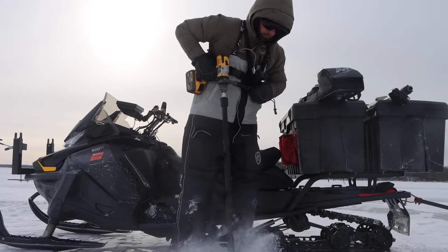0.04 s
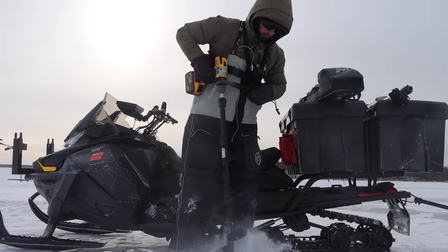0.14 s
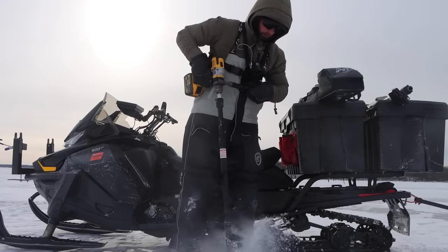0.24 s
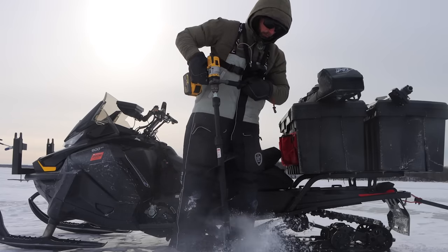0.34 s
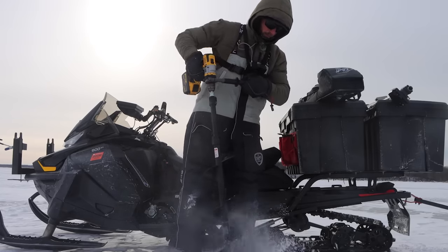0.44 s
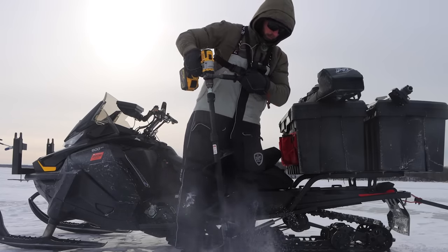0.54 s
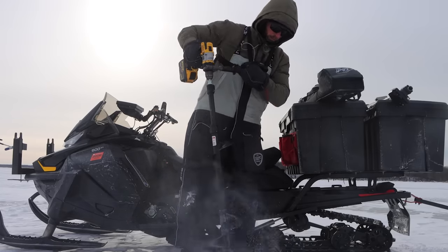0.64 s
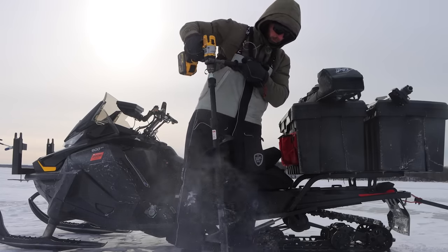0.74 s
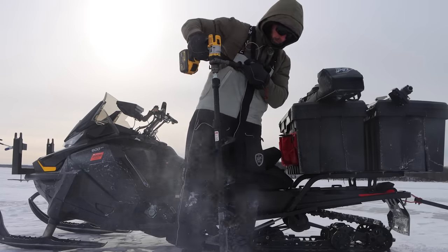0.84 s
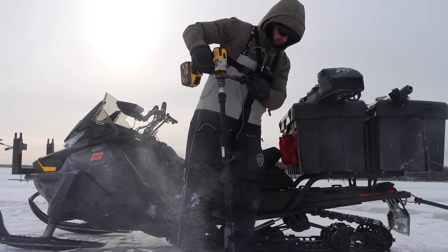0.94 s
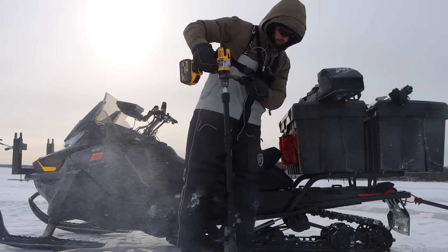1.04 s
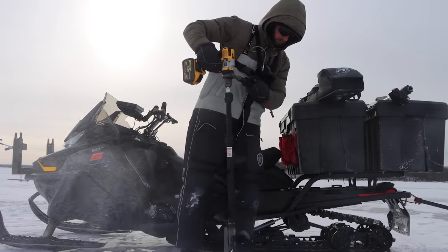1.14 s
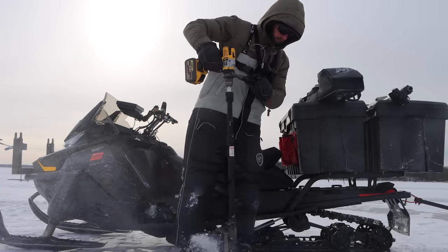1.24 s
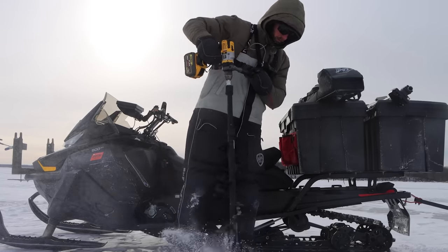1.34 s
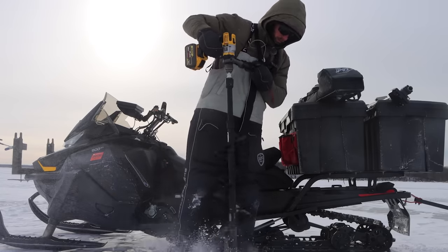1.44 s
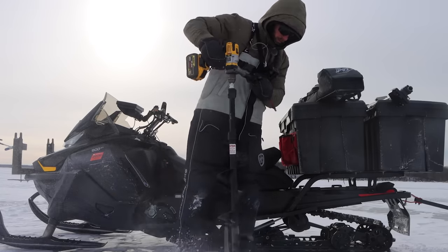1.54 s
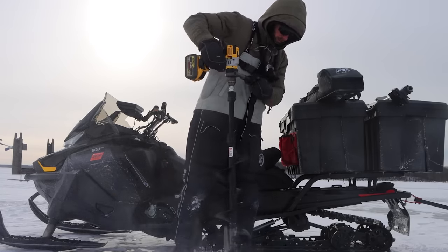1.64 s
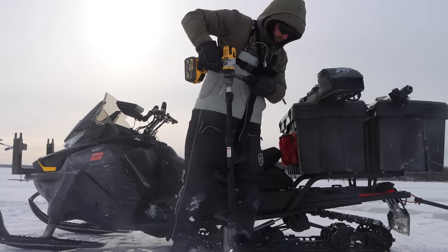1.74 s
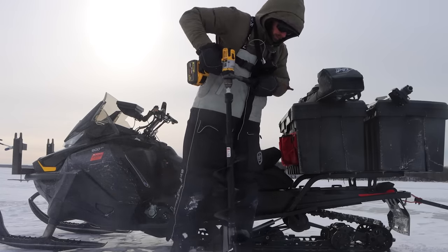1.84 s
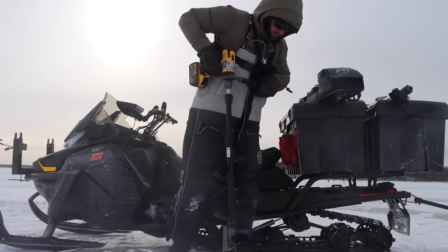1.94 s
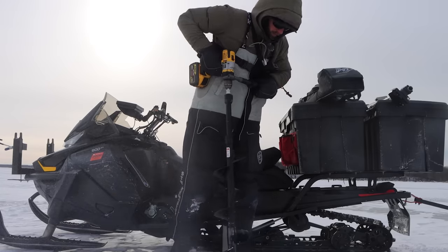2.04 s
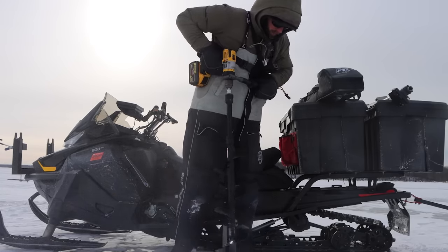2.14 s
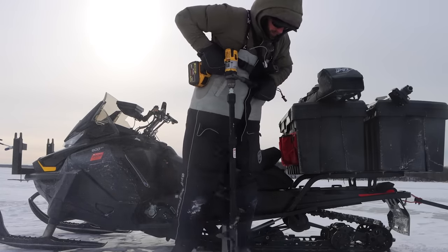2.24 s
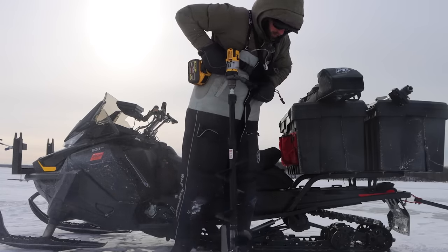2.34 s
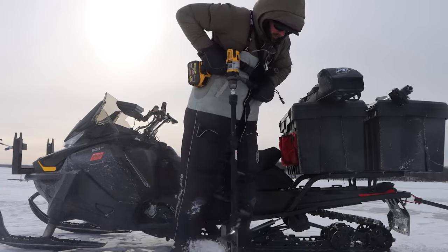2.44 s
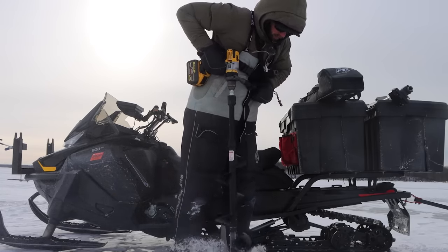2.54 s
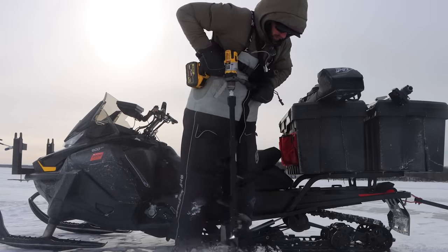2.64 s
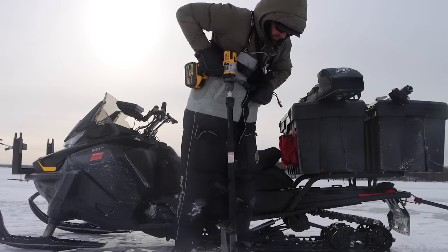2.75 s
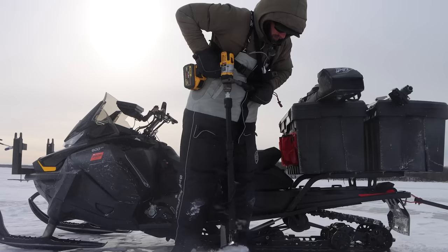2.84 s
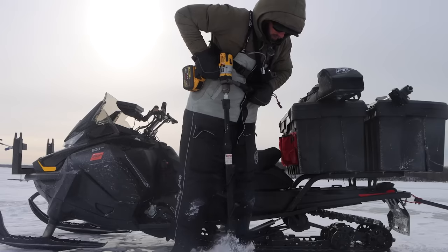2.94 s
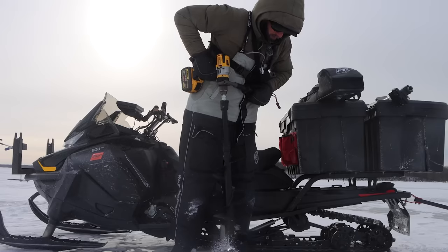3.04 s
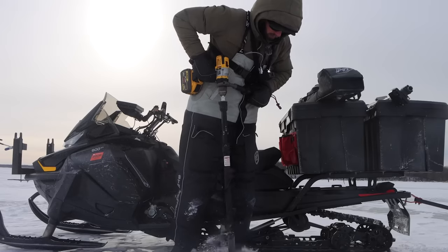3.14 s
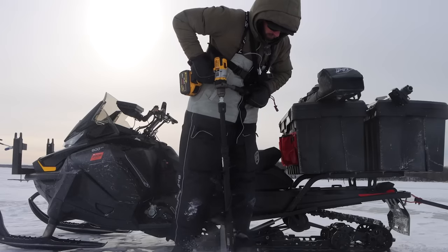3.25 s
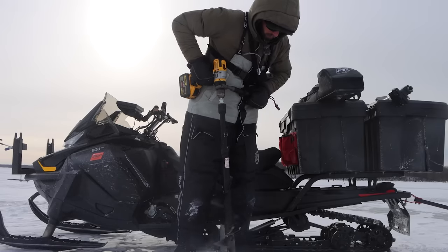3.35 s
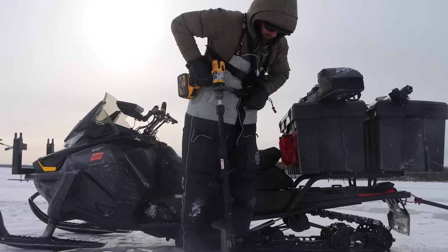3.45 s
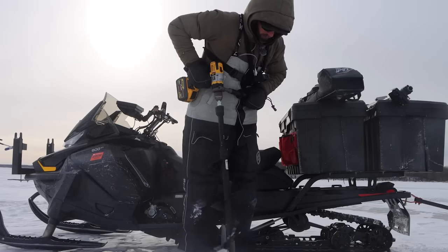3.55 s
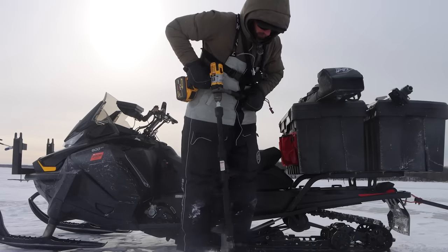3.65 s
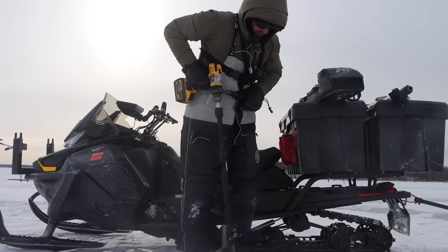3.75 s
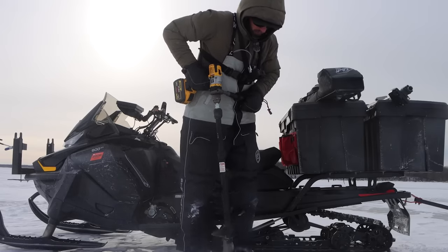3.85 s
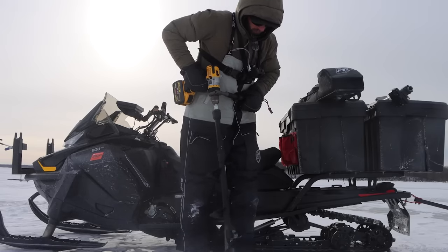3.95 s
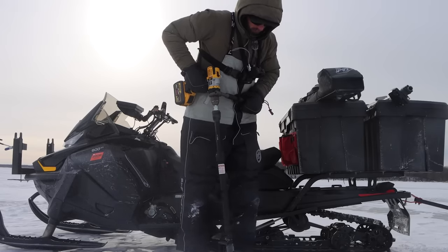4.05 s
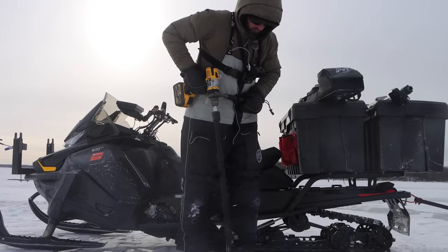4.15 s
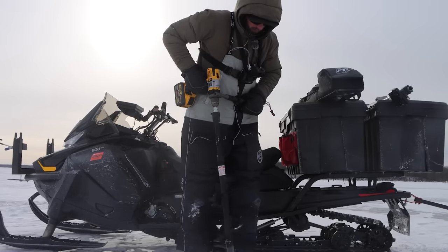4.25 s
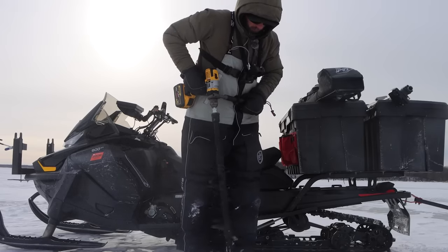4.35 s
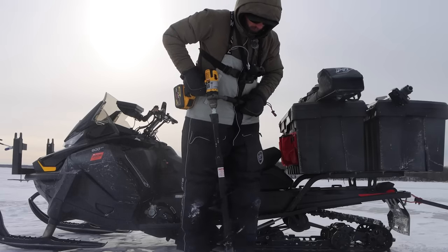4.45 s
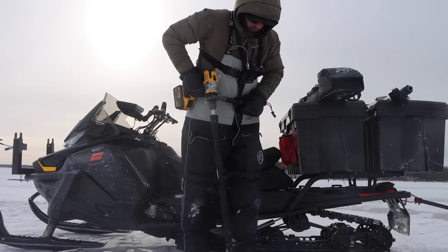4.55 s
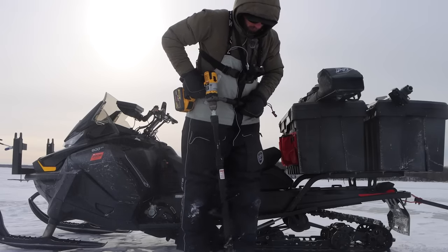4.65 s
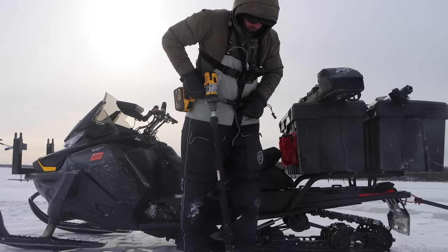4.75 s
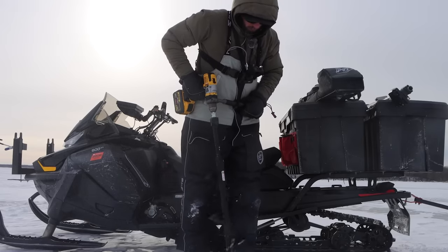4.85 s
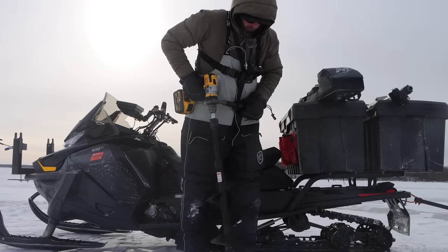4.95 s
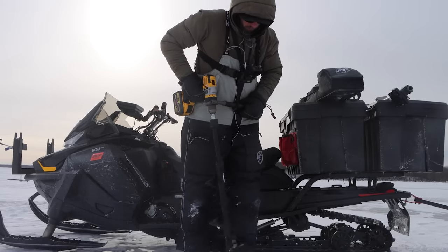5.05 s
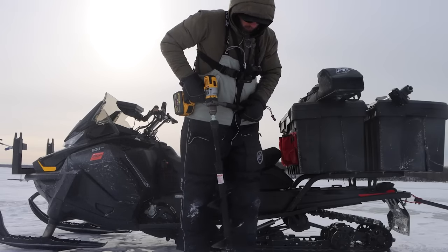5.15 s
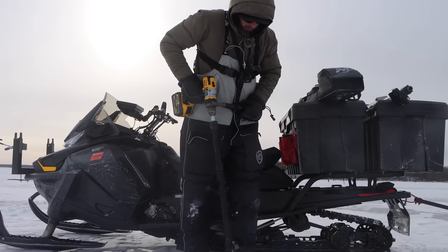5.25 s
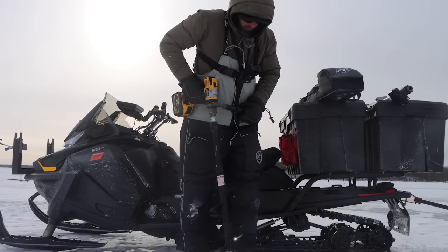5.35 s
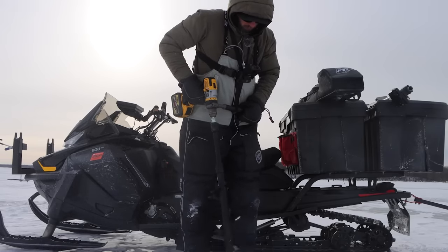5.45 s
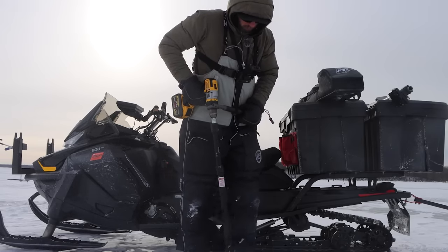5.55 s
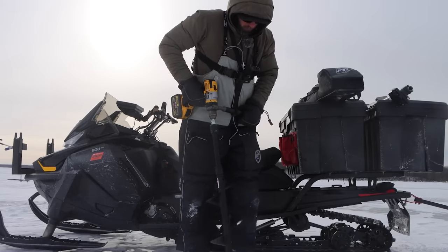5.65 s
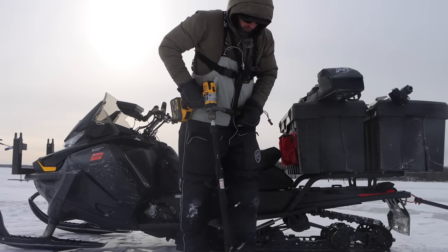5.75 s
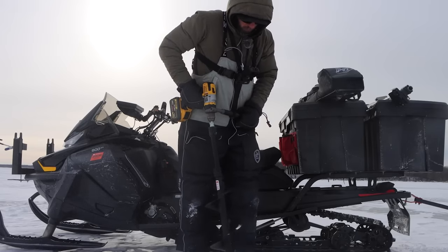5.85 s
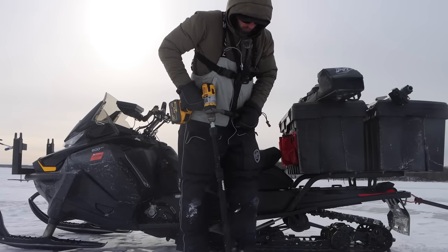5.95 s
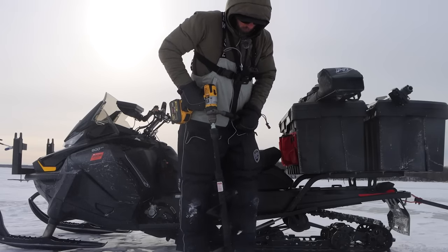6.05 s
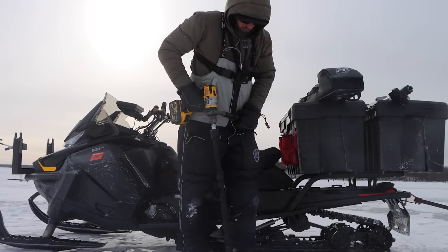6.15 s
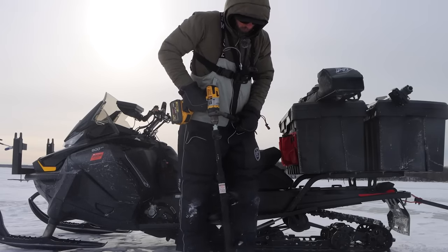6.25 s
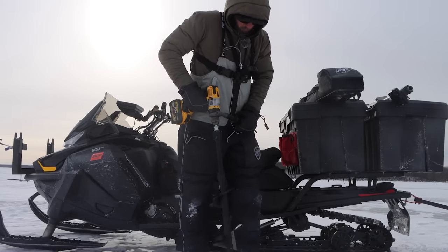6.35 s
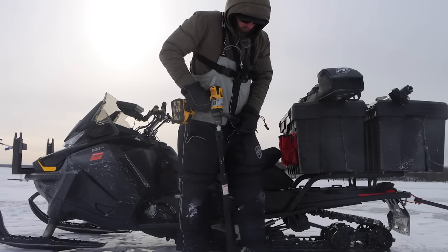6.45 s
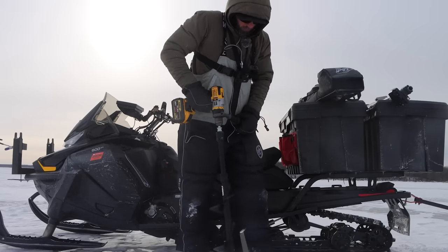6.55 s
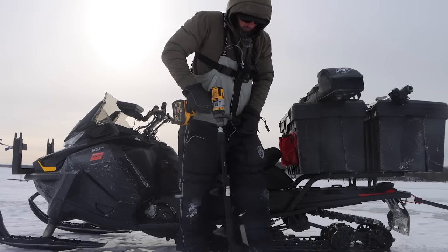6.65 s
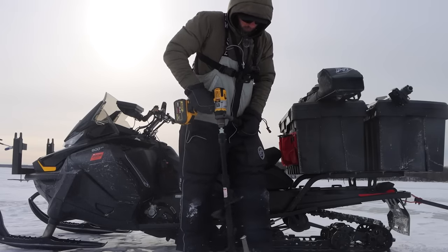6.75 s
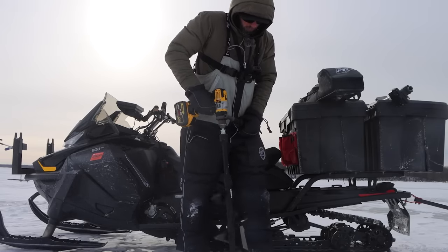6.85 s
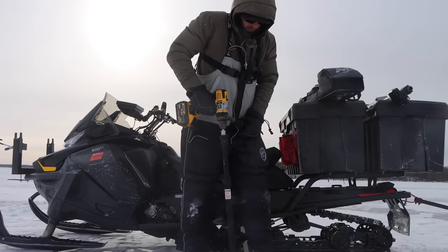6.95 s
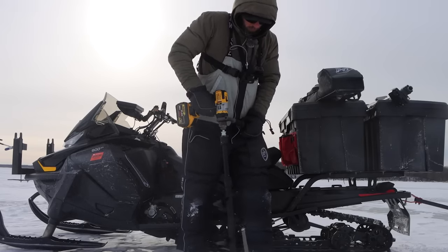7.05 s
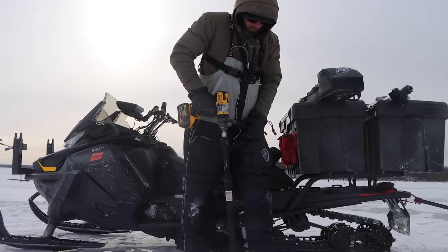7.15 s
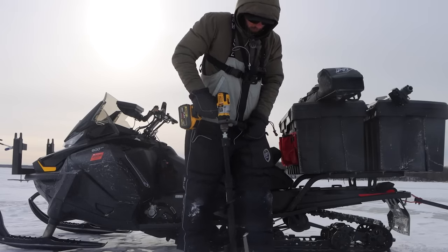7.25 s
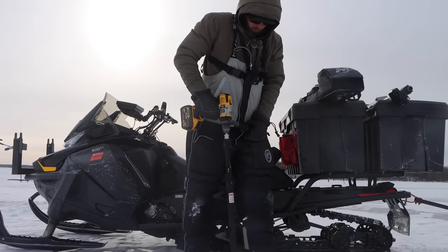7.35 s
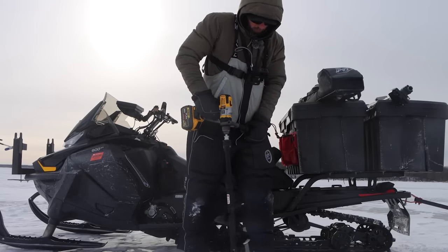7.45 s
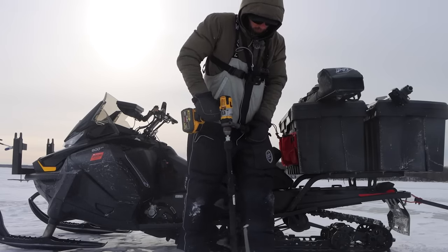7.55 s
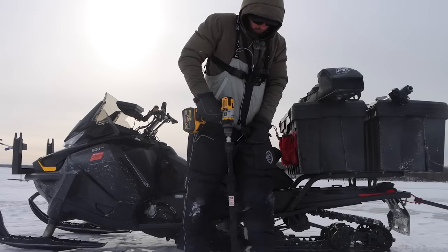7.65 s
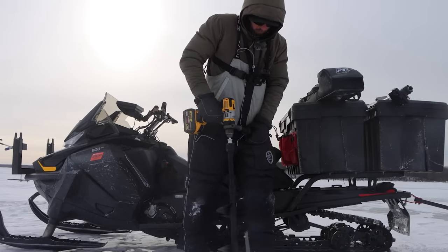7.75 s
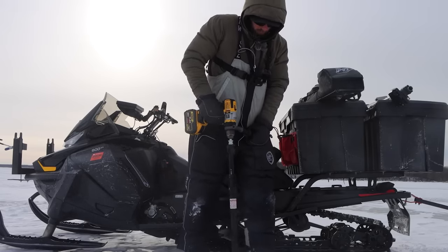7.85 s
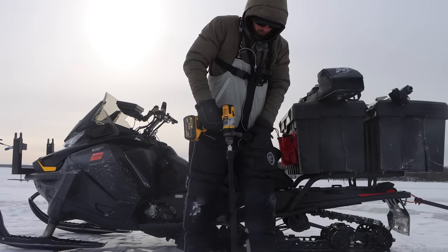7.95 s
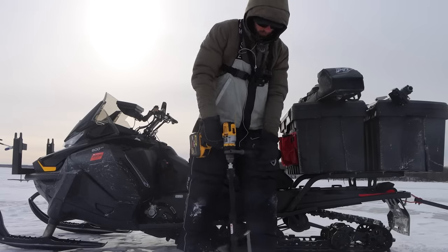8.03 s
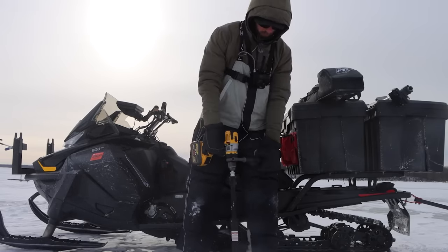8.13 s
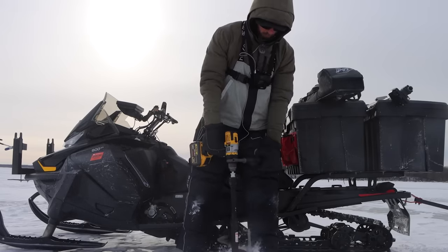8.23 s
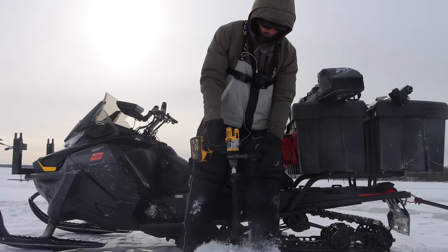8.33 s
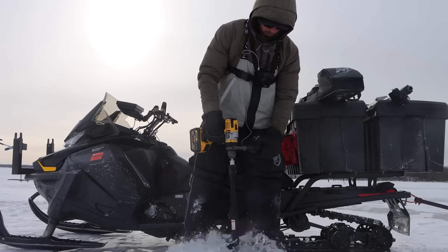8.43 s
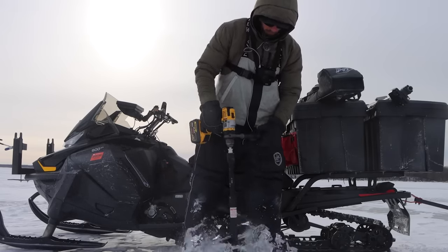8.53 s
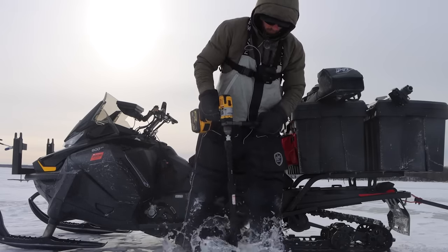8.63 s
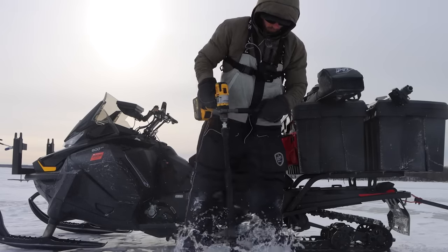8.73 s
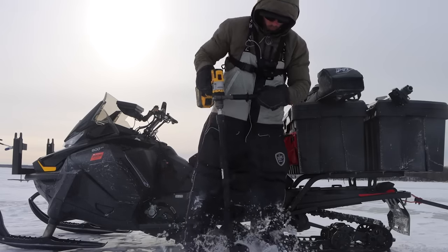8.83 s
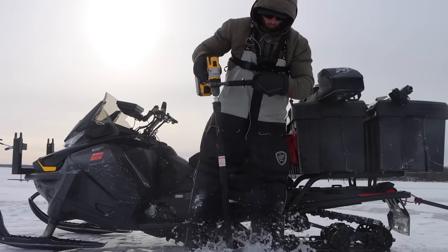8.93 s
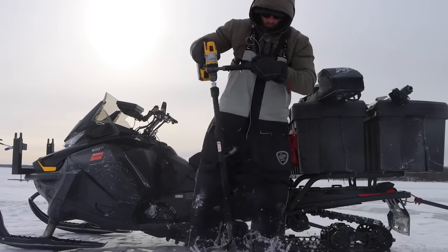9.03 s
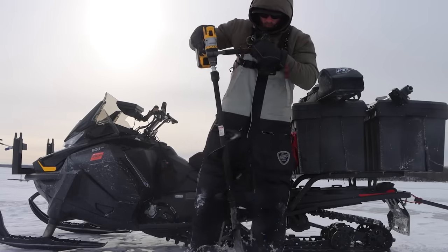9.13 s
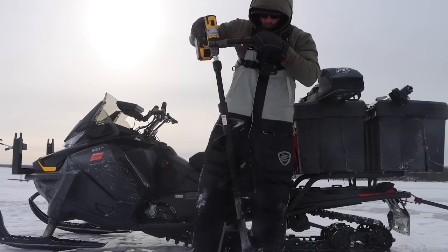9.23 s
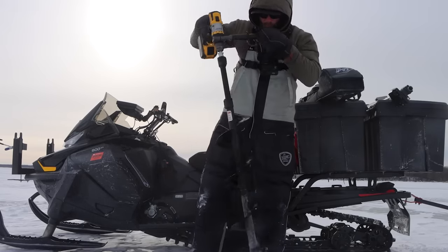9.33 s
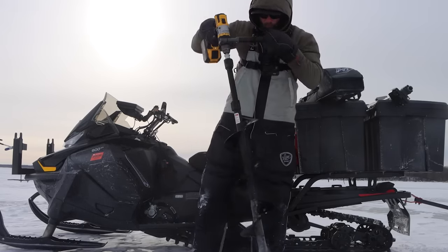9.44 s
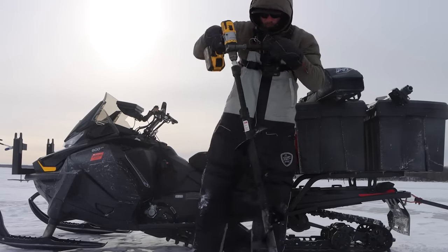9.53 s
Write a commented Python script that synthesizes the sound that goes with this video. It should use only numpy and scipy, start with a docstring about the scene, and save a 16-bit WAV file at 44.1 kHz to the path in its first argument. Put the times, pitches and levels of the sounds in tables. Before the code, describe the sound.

Close by on an open frozen lake, a cordless drill with an ice auger whirs briefly and stops, knocks against the ice, and spins again. Then it bores steadily, its gear whine strained and wavering over crunchy scraping and bright hiss. It speeds up as it breaks through, slush gurgles, and it stops with a sharp click and drips. Low wind buffets the microphone, nearly mono.

```python
"""On a windy frozen lake, a cordless drill drives an ice auger: two short bursts, a long bore, the break-through.
Motor and gears whine on orders of the rotor speed; blades shave ice as filtered grains and noise.
Ringing bubbles make the water gurgle in the hole, drops fizz off the flights, and knocks ring the auger.
Bits of ice patter while the drill rests; lumpy low noise is the wind on the microphone throughout."""
import sys
import numpy as np
from scipy import signal
from scipy.fft import rfft, irfft
from scipy.io import wavfile
from scipy.ndimage import uniform_filter1d

SR = 44100
rng = np.random.default_rng(int(sys.argv[2]) if len(sys.argv) > 2 else 0)


def master(y):
    """Save y as 16-bit WAV."""
    cut = np.clip(np.atleast_2d(y).T, -1, 1)
    pcm = np.round(cut * 32767)  # scale
    wavfile.write(sys.argv[1], SR, pcm.astype(np.int16))


N = 422919
TIME_S = np.arange(N) / SR

# All levels in the tables are relative: the sources add their own trims and chance.
# Trigger held: start_s, end_s, drag of snow or water when not cutting (0-1)
TRIGGER_RUNS = [(0, .385, 0.33), (1.09, 1.645, 0.04), (2.19, 9.07, .28)]
# Mean rotor speed through the three runs: time_s, speed_hz
ROTOR_SPEED = [(0, 271), (.05, 262.5), (.2, 364), (.28, 399), (.32, 381), (.383, 217.3), (1.09, 240.4),
               (1.15, 279.8), (1.2, 287), (1.276, 340), (1.38, 375), (1.42, 381), (1.605, 385.3),
               (1.644, 288), (2.19, 100.9), (2.23, 138), (2.255, 167.5), (2.28, 181.2), (2.32, 241),
               (2.374, 258), (2.67, 233.4), (3.0, 227.5), (3.9, 240.1), (4.45, 235.6), (4.75, 229.5),
               (5.2, 231.2), (6.2, 225), (6.6, 230.7), (7.0, 225.2), (7.3, 226.8), (7.55, 217.8),
               (7.75, 229.5), (7.9, 238), (8.025, 260.4), (8.04, 284.6), (8.06, 329), (8.09, 348),
               (8.16, 367.7), (8.3, 385), (8.95, 391), (9.015, 382), (9.07, 203)]
# Motor loudness: time_s, low_orders_db, tooth_whine_db
MOTOR_LEVELS = [(0, -28, -24), (.06, -19, -18.5), (.17, -22.5, -14), (.31, -29.5, -16.5), (.385, -36, -49),
                (1.09, -47, -29), (1.15, -16, -29), (1.23, -21, -21), (1.33, -30.5, -22), (1.42, -32, -22),
                (1.6, -28.5, -44), (1.645, -31, -50), (2.19, -37, -27), (2.25, -45, -21),
                (2.35, -21, -15.5), (2.6, -27.5, -20.5), (4.8, -29.5, -27), (7.2, -39.5, -29.5),
                (7.55, -45, -35), (7.8, -42, -25.5), (8.03, -39, -20), (8.05, -29, -37), (8.3, -33.5, -20),
                (8.99, -33.5, -18), (9.03, -29, -42), (9.07, -36, -42)]
# Motor and first gear stage: order (cycles per rotor turn), free_db, loaded_db
MOTOR_ORDERS = [(1, -10.5, -32), (1.992, 2.5, -37), (3.004, 5, -50), (3.96, 2.5, -10.5), (5.004, -1, -16.5),
                (4.94, -22, -2), (8.11, 4, -26), (8.22, -34, -3.5), (9.88, -35, -3.5), (10.04, -4, -45),
                (11.97, -54, -10.5), (20, 3, -72), (22.8, 5, -70)]
# Gear teeth: order (cycles per rotor turn), whine_db, sideband_hiss_db
TOOTH_ORDERS = [(16, 0, -8), (19.7, -14, -20), (24, -4, -8), (32, -4, 0), (40, -13, -4), (48, -14, -3)]
# Casing resonance that lifts each tooth order passing it: centre_hz, half_width_hz, lift_db
CASING_RESONANCE = (3700, 600, 7)
# Progress of the hole: time_s, share bored (0-1)
HOLE_DEPTH = [(2.5, 0), (7, 1)]
# Ice and air: time_s, scrape_db, hiss_db
BORING_LEVELS = [(0, -24, -14.5), (.13, -24.5, -16.5), (.38, -25.5, -21.5), (.42, -50.5, -61),
                 (.91, -43.5, -37.5), (1.01, -22.5, -27), (1.18, -22.5, -14.5), (1.35, -28.5, -23),
                 (1.67, -18, -20.5), (1.75, -37.5, -40.5), (1.92, -31.5, -32), (2.11, -41, -41.5),
                 (2.22, -18.5, -17), (2.3, -15.5, -12.5), (2.37, -18.5, -16), (4.3, -19, -15.5),
                 (6, -22, -15.5), (7.3, -22.5, -17), (8.0, -22, -17.5), (8.06, -24.5, -20),
                 (8.5, -22.5, -18), (8.86, -26, -17.5), (8.99, -20, -16), (9.03, -30, -21.5),
                 (9.1, -23.5, -29), (9.154, -33, -37.5), (9.254, -27.5, -31), (9.59, -38.5, -40.5)]
# Blades break off a lump: time_s, scrape_swell_db
BLADE_CATCHES = [(2.821, 8), (3.04, 4), (3.3, 2), (4.0, 5.5), (4.23, 3.5), (5.09, 4.5), (6.15, 1),
                 (6.97, 6.5), (7.22, 5.5)]
# Spectrum of the dull crunch: frequency_hz, level_db
SCRAPE_SPECTRUM = [(150, -11.5), (250, -9), (420, -7), (661, -3.5), (1130, 2.5), (1710, -0.5), (1910, -1),
                   (3500, -9), (4550, -24), (7700, -120)]
# Hiss while cutting at the top of the hole: frequency_hz, level_db
SHALLOW_HISS_SPECTRUM = [(1350, -43), (2300, -6.5), (3420, -3), (3710, -1), (4470, -4.5), (5710, -1),
                         (8710, -7.5), (15000, -11.5), (16000, -7)]
# Hiss while cutting deep in the hole: frequency_hz, level_db
DEEP_HISS_SPECTRUM = [(1350, -3), (2300, 0.5), (3130, -3.5), (3400, -14.5), (3680, -1), (5180, -7),
                      (6190, -0.5), (7220, 3), (8920, -4.5), (10700, -2), (11600, -9.5), (15100, -9.5),
                      (16000, -15.5)]
# Hiss while turning free: frequency_hz, level_db
FREE_HISS_SPECTRUM = [(1350, -42), (2300, -7), (2750, -18), (3030, -3), (3400, -6), (3900, -2),
                      (5350, -4.5), (6040, -3), (7050, 1.5), (9600, -0.5), (10800, 0), (12200, -5.5),
                      (15000, -3), (16000, -20)]
# Hiss of sliding and falling chips, trigger released: frequency_hz, level_db
STOPPED_HISS_SPECTRUM = [(1060, -43), (1800, -29), (2200, -4), (2640, -5), (10900, -12.5), (16000, -27)]
# Gurgle in the hole: time_s, level_db
WATER_LEVEL = [(8.0, -27), (8.412, -18), (8.462, -15), (8.734, -19), (8.962, -28.5), (8.98, -21.5),
               (9.3, -32)]
# Single glugs and drips: start_s, level_db, starting_pitch_hz
SINGLE_BUBBLES = [(8.115, -15, 650), (8.195, -11, 575), (8.48, -12, 640), (8.565, -13, 369),
                  (8.636, -16, 605), (8.71, -9.5, 452), (8.769, -14.5, 279), (8.975, -15, 512),
                  (9.015, -12, 414), (9.046, -15.5, 388), (9.228, -18, 2260), (9.281, -22, 1360),
                  (9.338, -21, 2020), (9.342, -17, 3500), (9.356, -20, 1100), (9.458, -22, 3700),
                  (9.562, -26, 2600)]
# Water flung off the flights: time_s, level_db
SPRAY_LEVEL = [(8.45, -42), (8.75, -29), (8.98, -20), (9.04, -43)]
# Band of the spray: low_hz, high_hz
SPRAY_BAND = [7400, 12100]
# Knocks of auger and chuck, falling ice: start_s, crack_db, dull_part_db, decay_t60_s
KNOCK_EVENTS = [(0.2947, -14.5, -35, 0.027), (0.3567, -13, -32, 0.021), (0.3784, -22, -27, 0.022),
                (0.7324, -32.5, -32.5, 0.025), (0.984, -11.5, -6.5, 0.016), (1.0034, -1.5, -6.5, 0.023),
                (1.0216, -17, -14, 0.021), (1.0319, -6, -12.5, 0.016), (1.0416, -11, -17, 0.021),
                (1.0732, -9.5, -27, 0.033), (1.274, -13, -30, 0.032), (1.299, -13.5, -30, 0.046),
                (1.337, -16.5, -35, 0.035), (1.6279, -29, -11.5, 0.036), (1.638, -15, -18, 0.032),
                (1.655, -14, -16, 0.04), (1.6632, -10.5, -14, 0.034), (1.681, -21, -19, 0.027),
                (1.7024, -20, -23, 0.023), (1.771, -24, -30, 0.029), (1.8944, -20, -32, 0.031),
                (1.9672, -22, -28, 0.016), (2.1476, -21, -34, 0.035), (9.076, -15, -33, 0.017),
                (9.1048, 1.5, -37, 0.0094), (9.1127, -3, -31, 0.014)]
# Ringing modes of the auger: pitch_hz, level_db, decay_t60_s
AUGER_MODES = [(477.4, 1, 0.033), (780, 6.5, 0.011), (1310, 23, 0.0043), (2600, 12, 0.018),
               (3700, 9, 0.0066), (5240, 8, 0.012), (6640, 6, 0.0069), (8500, -2, 0.0058),
               (10440, 4.5, 0.0057)]
# Wind on the microphone: time_s, rumble_db, flutter_db
WIND_LEVELS = [(0.0, -13, -24.5), (0.32, -13.5, -20.5), (0.87, -25, -40), (1.03, -20, -25),
               (1.09, -7.5, -21), (1.19, -27, -32), (1.33, -16.5, -29), (2.07, -12, -27), (2.2, -18, -26.5),
               (3.37, -17, -24), (4.51, -18, -26.5), (4.65, -17, -15), (4.92, -12.5, -19),
               (5.74, -16.5, -21.5), (5.85, -30, -35), (6.03, -17.5, -21), (7.76, -13.5, -19),
               (8.74, -16.5, -24.5), (8.8, -28, -29), (8.93, -17, -28), (9.35, -25.5, -41.5),
               (9.54, -19, -32)]
# Stereo difference: frequency_hz, side_minus_mid_db
SIDE_SPECTRUM = [(60, -47), (500, -33.5), (2000, -56.5), (15000, -36.5)]

# Load shows as sag below the free speed, except while braking
FREE_HZ, FULL_LOAD_SAG_HZ, BRAKE_S = 385, 165.8, 0.063
# Rotor turns per auger turn; a moment when the blades cut easiest
GEAR_RATIO, EASY_TURN_S = 51.5, 5.17
# Swing at full load once per auger turn, share of its second harmonic, chance part
WOBBLE_HZ, WOBBLE_PEAKY, WOBBLE_CHANCE_HZ = 4.2, .4, 2.5
BRAKE_GROWL_DB, BRAKE_REST_DB = 7, -9  # braking lifts the fourth order and mutes the other low orders
RAGGED_PER_HZ_S = .00002  # extra flutter of the teeth per Hz/s of acceleration
# Tooth hiss when free, its rise at full load, and its further rise with depth
TOOTH_HISS_DB, TOOTH_HISS_LOAD_DB, TOOTH_HISS_DEPTH_DB = -47, 12, 7.5
CATCH_S = 0.031  # a swell falls to 1/e of its dB this far from its middle
PATTER_PER_S, PATTER_DB, PATTER_T60_S = 14, -41, .025  # level is before the tone curve
CUTOFF_HZ = 16150  # stopband edge


def from_db(db):
    """Decibels to gain."""
    return 10 ** (np.asarray(db) / 20)


def rms_one(x):
    """Scale to unit rms."""
    return x / np.sqrt(np.mean(x ** 2) + 1e-20)


def in_time(rows):
    """Columns of a table, interpolated sample by sample."""
    times_s, *columns = np.transpose(rows)
    return [np.interp(TIME_S, times_s, column) for column in columns]


def coloured(x, points):
    """Give a signal the level curve (frequency_hz, level_db), straight over log frequency."""
    bins_hz = np.maximum(np.arange(N // 2 + 1) * SR / N, 1)
    curve_hz, curve_db = np.transpose(points)
    gain = from_db(np.interp(np.log(bins_hz), np.log(curve_hz), curve_db))
    return irfft(rfft(x) * gain, N)


def drift(rate_hz):
    """Slow chance: noise through a double one-pole low-pass, spread 1."""
    r = np.exp(-2 * np.pi * rate_hz / SR)
    noise = rng.standard_normal(N + SR)  # the first second lets the filter settle
    return rms_one(signal.lfilter([1], [1, -2 * r, r * r], noise)[SR:])


def ring(clicks, hz, t60):
    """A unit click sets a decaying sine of starting height 1 ringing."""
    r, w = from_db(-60 / (t60 * SR)), 2 * np.pi * hz / SR
    return signal.lfilter([0, np.sin(w)], [1, -2 * r * np.cos(w), r * r], clicks + 1e-18)


def grains(per_s, spread_db):
    """Random clicks of uneven size and sign."""
    sizes = from_db(spread_db * np.minimum(rng.exponential(1, N), 5))
    signs = rng.choice([-1, 1], N)
    return sizes * signs * (rng.random(N) < per_s / SR)


def motor(load, low_db, whine_db):
    """Orders of the rotor; load shakes the speed, backlash makes the tooth whine flutter and stutter."""
    rotor_hz = rotor(load) * (1 + .005 * load * drift(20))
    depth = in_time(HOLE_DEPTH)[0]
    acceleration = np.gradient(in_time(ROTOR_SPEED)[0]) * SR
    ragged = .011 + RAGGED_PER_HZ_S * np.clip(acceleration, 0, 1000)
    turn = 2 * np.pi * np.cumsum(rotor_hz) / SR
    mesh = 2 * np.pi * np.cumsum(rotor_hz * (1 + ragged * drift(60))) / SR
    brake = braking()
    out = np.zeros(N)

    for order, free_db, loaded_db in MOTOR_ORDERS:
        waver_db = (.8 + 2.2 * load) * drift(15) + 2.0 * load * drift(70)
        waver_db += brake * (BRAKE_GROWL_DB if round(order) == 4 else BRAKE_REST_DB)
        level_db = low_db + free_db + load * (loaded_db - free_db) + waver_db
        out += np.sqrt(2) * from_db(level_db) * np.sin(order * turn)

    hiss_db = TOOTH_HISS_DB + TOOTH_HISS_LOAD_DB * load + TOOTH_HISS_DEPTH_DB * load * depth
    centre_hz, half_width_hz, casing_db = CASING_RESONANCE
    for order, line_db, hump_db in TOOTH_ORDERS:
        # uneven teeth spread sidebands around each line
        hump = drift(170) * np.sin(order * mesh) + drift(160) * np.cos(order * mesh)
        resonance = 1 / (1 + ((order * rotor_hz - centre_hz) / half_width_hz) ** 2)
        lift_db = casing_db * (resonance - (order == 16))  # the 16th starts lower by the full lift
        stutter = 1 + .65 * np.tanh(drift(45))
        # overtones of the mesh need teeth pressed hard together and blur with depth
        slack_db = (order - 16) * (1.4 * (load - .9) - .15 * depth)
        line = from_db(line_db + lift_db + slack_db) * stutter * np.sin(order * mesh)
        out += from_db(whine_db) * line
        out += from_db(hump_db + hiss_db + 3.4 * drift(51)) * hump
    return out


def rotor(load):
    """Rotor speed in Hz: under load it surges once per turn of the auger."""
    mean_hz = in_time(ROTOR_SPEED)[0]
    turns = np.cumsum(mean_hz) / SR
    auger = 2 * np.pi * (turns - turns[round(EASY_TURN_S * SR)]) / GEAR_RATIO
    surge_hz = WOBBLE_HZ * (np.cos(auger) + WOBBLE_PEAKY * np.cos(2 * auger))
    surge_hz += WOBBLE_CHANCE_HZ * drift(6)
    return mean_hz + load ** 2 * surge_hz


def strain():
    """Load 0-1 from the sag of the speed; the drag of each run is its floor."""
    sag = np.clip((FREE_HZ - in_time(ROTOR_SPEED)[0]) / FULL_LOAD_SAG_HZ, 0, 1)
    sag = sag * (1 - braking())
    return sum(((TIME_S >= start) & (TIME_S <= end)) * (drag * (1 - sag) + sag)
               for start, end, drag in TRIGGER_RUNS)


def braking():
    """Rises to 1 in the last moments of each run, while the motor brakes, and holds briefly past its end."""
    out = np.zeros(N)
    for start, end, _ in TRIGGER_RUNS:
        onset = np.clip(4 * (1.25 - (end - TIME_S) / BRAKE_S), 0, 1)
        out += onset * (TIME_S > start) * (TIME_S <= end + BRAKE_S)
    return out


def trigger():
    """1 while the trigger is held, with softened edges."""
    held = sum((TIME_S >= start) & (TIME_S <= end) for start, end, _ in TRIGGER_RUNS)
    return uniform_filter1d(held * 1., size=400)


def boring(load, running):
    """Blades and flights shave and toss ice: dull crunch in clumps, bright hiss of fine chips and fan air."""
    scrape_db, hiss_db = in_time(BORING_LEVELS)
    for s, swell_db in BLADE_CATCHES:
        scrape_db = scrape_db + swell_db * np.exp(-((TIME_S - s) / CATCH_S) ** 2)
    depth = in_time(HOLE_DEPTH)[0]
    bite = drift(4.1)  # the blades catch unevenly; both layers feel it

    clumps = grains(2500 * from_db(3.0 * drift(30)), spread_db=1.5)
    crunch = rms_one(clumps) + 1.06 * rng.standard_normal(N)
    scrape = rms_one(coloured(crunch, SCRAPE_SPECTRUM))

    chips = rms_one(grains(9000, spread_db=3.5)) + 1.34 * rng.standard_normal(N)
    chips = chips * from_db(0.082 * bite + 0.86 * drift(69))
    shallow = rms_one(coloured(chips, SHALLOW_HISS_SPECTRUM))
    deep = rms_one(coloured(chips, DEEP_HISS_SPECTRUM))
    free = rms_one(coloured(chips, FREE_HISS_SPECTRUM))
    stopped = rms_one(coloured(chips, STOPPED_HISS_SPECTRUM))
    cutting = (1 - depth) * shallow + depth * deep
    hiss = running * (load * cutting + (1 - load) * free) + (1 - running) * stopped
    return from_db(scrape_db - 4.0 + 1.45 * bite) * scrape + from_db(hiss_db - 1.5) * hiss


def knocks():
    """Each knock is a crack of chattering contacts that also rings the auger with strengths of its own."""
    out, t = np.zeros(N + 6000), np.arange(6000) / SR
    draws = rng.standard_normal((len(KNOCK_EVENTS), len(AUGER_MODES)))
    crack_band = signal.butter(1, [1800, 9000], "band", fs=SR, output="sos")
    for (s, crack_db, dull_db, t60), draw in zip(KNOCK_EVENTS, draws):
        chatter = rng.standard_normal(len(t)) * from_db(-60 * t / t60) * np.tanh(t / 0.001)
        hit = from_db(crack_db + 8.5) * signal.sosfilt(crack_band, chatter)
        for (hz, mode_db, ring_s), chance in zip(AUGER_MODES, draw):
            drive_db = dull_db - 24.0 if hz < 1900 else crack_db - 33.5
            hit += from_db(drive_db + mode_db + 2 * chance) * ring(chatter, hz, ring_s)
        at = round(s * SR)
        out[at:at + len(t)] += hit
    return out[:N]


def water():
    """Large bubbles burst in the slush and ring a few cycles each."""
    born, dealt = grains(260, spread_db=1.0), rng.integers(0, 14, N)
    pitches_hz = np.geomspace(230, 900, num=14)
    rings = sum(ring(born * (dealt == k), hz, 17.0 / hz) for k, hz in enumerate(pitches_hz))
    welling = (TIME_S > WATER_LEVEL[0][0]) & (TIME_S < WATER_LEVEL[-1][0])
    gate = uniform_filter1d(welling * 1., size=3000)
    return from_db(in_time(WATER_LEVEL)[0] - 5.0) * rms_one(rings) * gate


def bubbles():
    """Each bubble fades by the cycle, its pitch rising as it nears the surface."""
    out, t = np.zeros(N + 6000), np.arange(6000) / SR
    for s, level_db, hz in SINGLE_BUBBLES:
        cycles = hz * t
        envelope = from_db(level_db - 1.46 * cycles) * np.tanh(cycles)
        at = round(s * SR)
        out[at:at + len(t)] += envelope * np.sin(2 * np.pi * cycles * (1 + 0.01178 * cycles))
    return out[:N]


def spray():
    """Fine drops, dense clicks in a high band, fizz as the auger comes out of the water."""
    band = signal.butter(2, SPRAY_BAND, "band", fs=SR, output="sos")
    fizz = signal.sosfilt(band, grains(8000, spread_db=5.0))
    level_db = in_time([(0, -120), *SPRAY_LEVEL, (SPRAY_LEVEL[-1][0] + .1, -120)])[0]
    return from_db(level_db) * rms_one(fizz)


def patter():
    """Each dropping bit of ice is a short broad tick of dying noise."""
    hits = np.abs(grains(PATTER_PER_S, spread_db=3.0)) + 1e-18
    dying = signal.lfilter([1], [1, -from_db(-60 / (PATTER_T60_S * SR))], hits)
    ticks = dying * rng.standard_normal(N)
    return from_db(PATTER_DB) * coloured(ticks, [(300, -30), (1000, 2), (4000, -12), (12000, -18)])


def wind():
    """Eddies push the diaphragm: lumpy rumble, with faster flutter riding on the same lumps."""
    rumble_db, flutter_db = in_time(WIND_LEVELS)
    lumps = drift(7.4)
    push = coloured(rng.standard_normal(N), [(5, -6), (12, 0.5), (24, -3.5), (45, -4.5), (75, -16),
                                             (140, -49.5), (400, -60.0)])
    flutter = coloured(rng.standard_normal(N), [(40, -10), (90, 1.0), (160, -6.5), (260, -14.0),
                                                (500, -21.5), (1500, -41)])
    rumble_gain = from_db(rumble_db + 2.1 * lumps)
    flutter_gain = from_db(flutter_db - 2.5 + 1.4 * lumps + 3.0 * drift(23))
    return rumble_gain * rms_one(push) + flutter_gain * rms_one(flutter)


def scene():
    """All sources near the middle; a faint blurred share differs between the two channels."""
    load, running = strain(), trigger()
    mid = running * motor(load, *in_time(MOTOR_LEVELS)) + boring(load, running) + knocks()
    mid += water() + bubbles() + spray()
    mid += (1 - running) * patter() + wind()
    blur = rng.standard_normal(600) * np.exp(-np.arange(600) / 120)
    blurred = signal.fftconvolve(mid, blur / np.linalg.norm(blur))[:N]
    side = coloured(blurred, SIDE_SPECTRUM)
    return np.array([mid + side, mid - side])


def record(dry):
    """Peaks are rounded towards a ceiling of 1.2, then the top of the spectrum is cut steeply."""
    rounded = 1.2 * np.tanh(dry / 1.2)
    return signal.sosfilt(signal.cheby2(20, 80, CUTOFF_HZ, fs=SR, output="sos"), rounded)


dry = scene()
out = record(dry)
master(out)
```